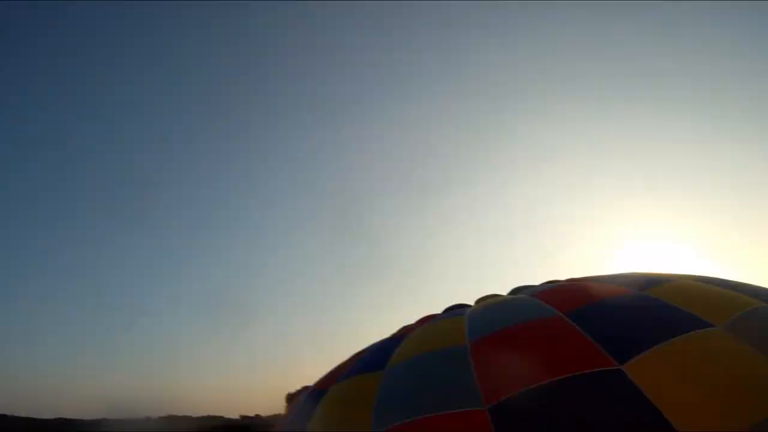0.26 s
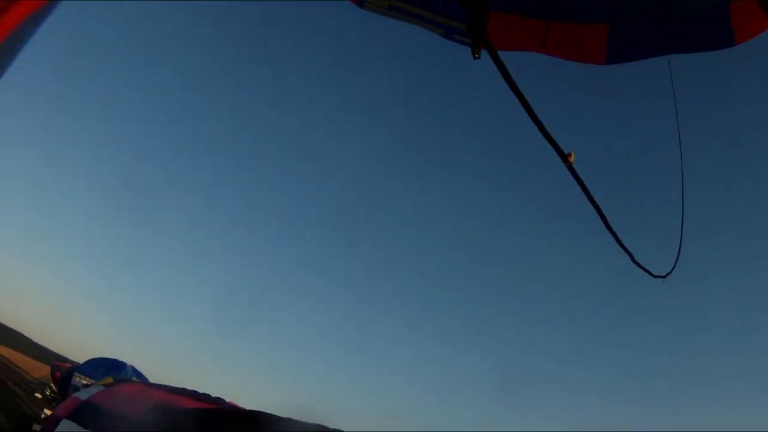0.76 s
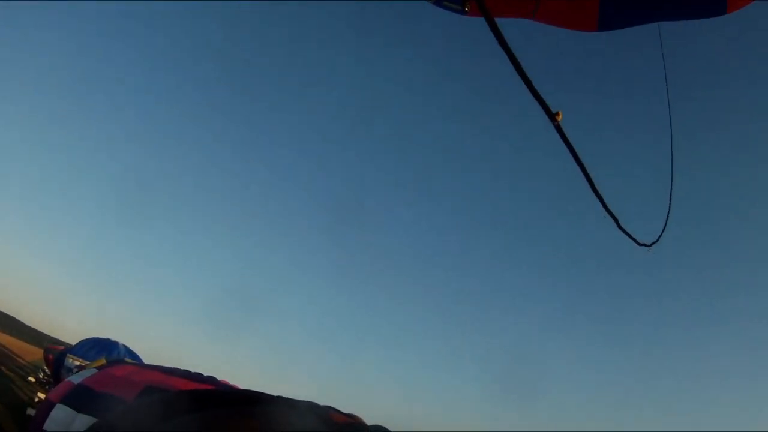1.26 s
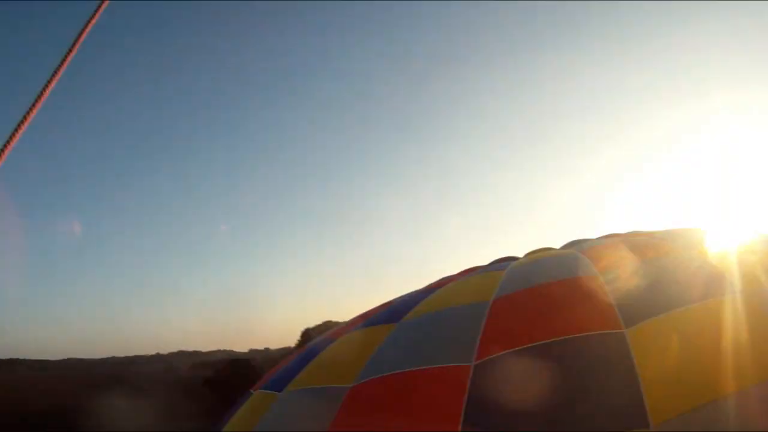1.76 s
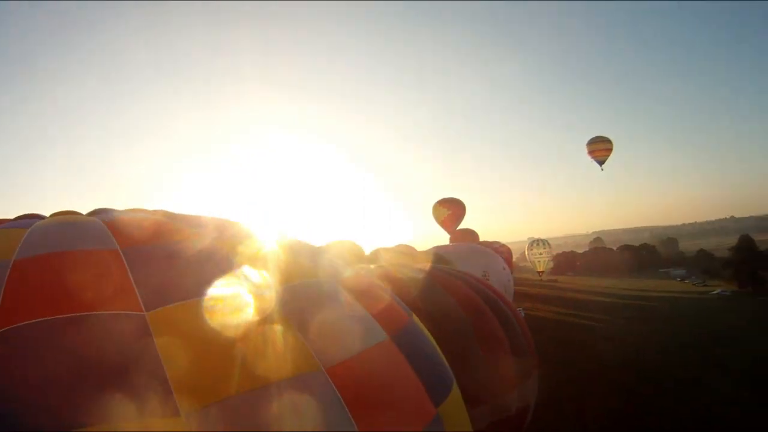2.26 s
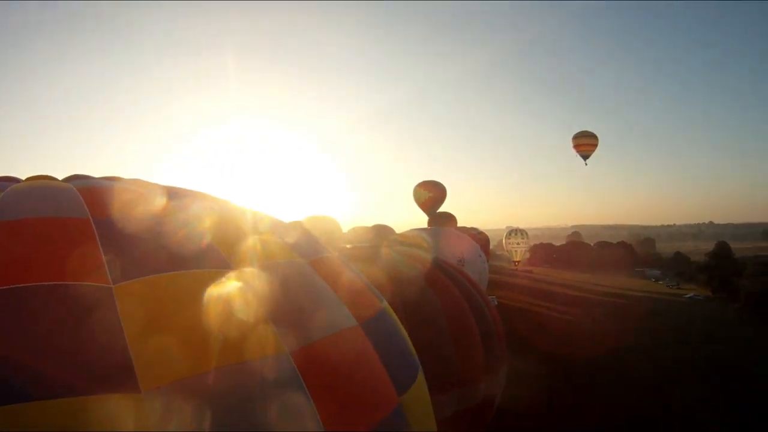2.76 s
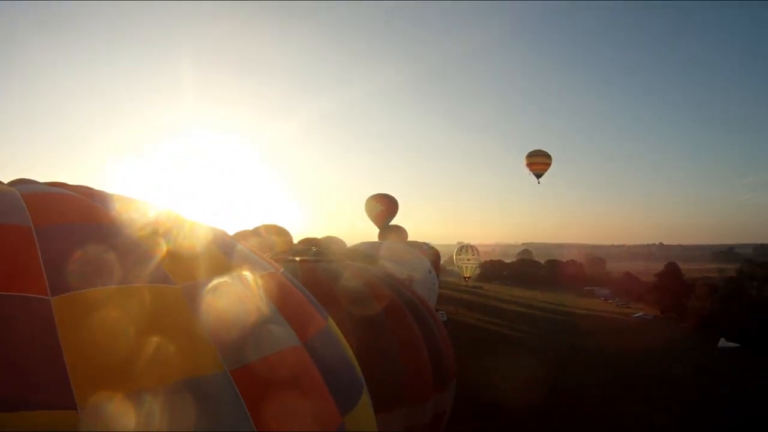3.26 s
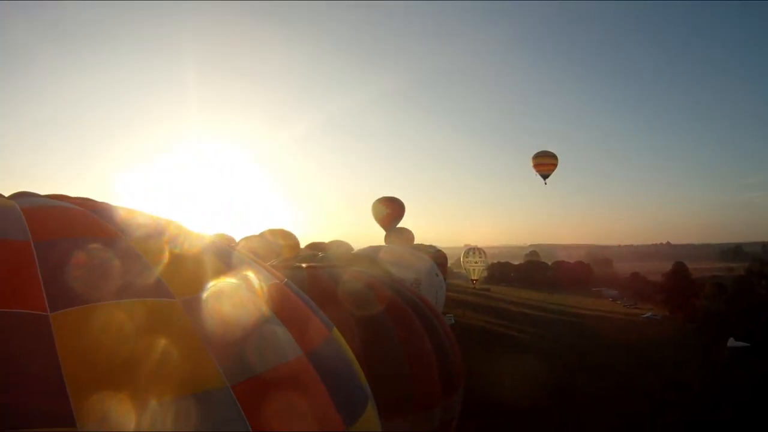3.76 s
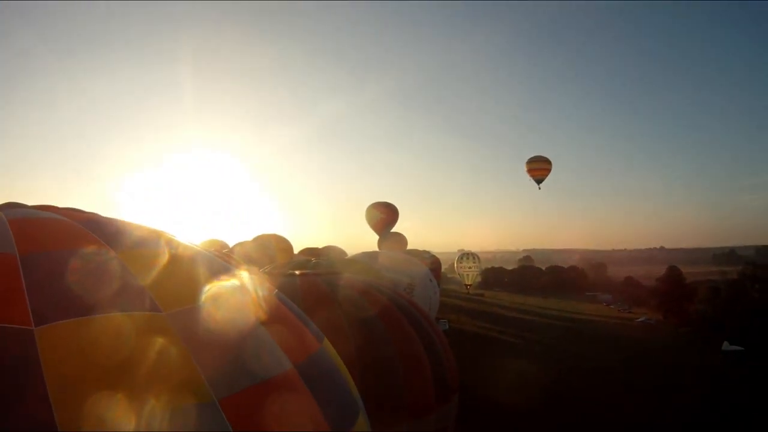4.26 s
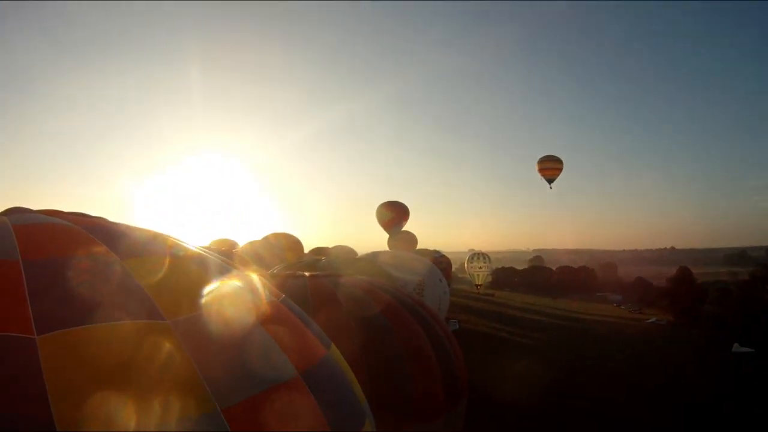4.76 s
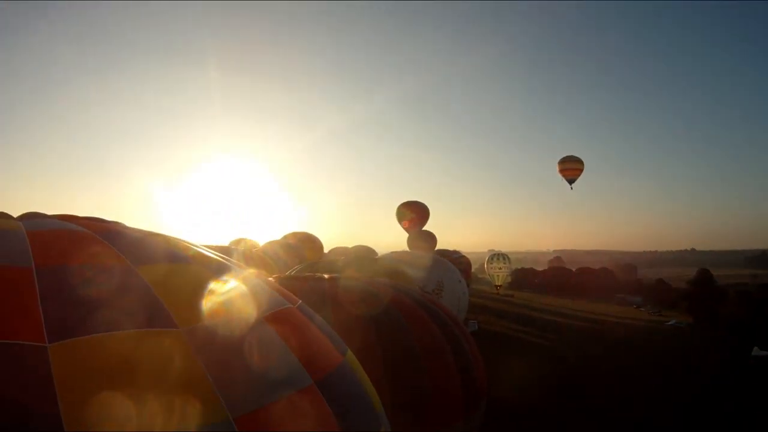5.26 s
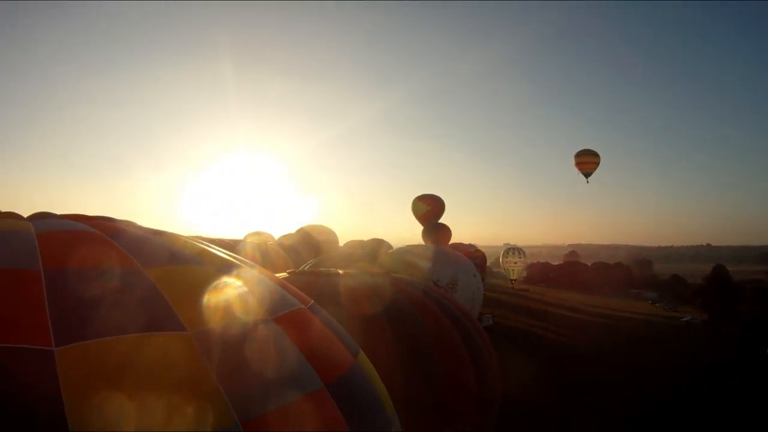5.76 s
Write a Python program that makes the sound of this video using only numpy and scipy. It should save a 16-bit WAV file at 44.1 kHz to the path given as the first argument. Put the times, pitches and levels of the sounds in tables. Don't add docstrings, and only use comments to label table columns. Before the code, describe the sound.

A balloon gas burner is heard very close, outdoors, through a small sealed camera: dull, bass-heavy, gritty and mono. It is already roaring at the start, with a soft thump near 0.1 s, and dies quickly around 0.4-0.5 s. Until 1.67 s only a much quieter rush of distant burners and fans remains, with low breeze buffeting from about 0.9 s. At 1.69 s a massive double thump with a cracking edge and bright tick lights a long blast; the level dips for an instant, then the deep fluttering roar and muffled hiss hold, the hiss easing from about 3 s and the flame cutting out at 3.5-3.6 s. The far rush returns. At 4.8 s quick hard thumps start a short blast, with more pops near 4.95 and 5.06 s, fading by 5.4 s. After a brief gap, the last blast bangs alight at 5.6 s, with several thumps, sinking from 5.9 s until the end.

```python
import sys
import numpy as np
from scipy import signal
from scipy.fft import rfft, irfft
from scipy.io import wavfile
from scipy.ndimage import uniform_filter1d

SR = 44100
rng = np.random.default_rng(int(sys.argv[2]) if len(sys.argv) > 2 else 0)


def unload_audio(sound):
    columns = np.transpose(np.atleast_2d(sound))
    steps = np.round(np.clip(columns, -1, 1) * 32767)
    wavfile.write(sys.argv[1], SR, steps.astype(np.int16))


def ratio(d):
    e = np.asarray(d, float) / 20
    return 10 ** e


N = 264600

# [t/s, peak level/dB, pace f/Hz, camera gain cut afterwards/dB, suction over push/ratio]
FLAME_PULSES = [(.114, -3, 234, 4, 0.95), (1.6881, 0, 82, 14.5, .45), (1.7056, -2.5, 115, 8, 0.63),
                (4.7935, -7.5, 161, -2.5, 0.17), (4.8057, 0.5, 335, 5.5, 1.1),
                (4.8180, -6.5, 142, -1.9, 0.96), (4.95, -4.5, 239, 3, 0.51), (5.0644, -6, 218, 3.5, 1.5),
                (5.606, 0.5, 240, 0, 6.3), (5.618, -5.5, 150, 0.6, 0.55), (5.668, -3.5, 169, 2, 0.44),
                (5.722, -6, 220, 0.5, .3), (5.7346, -4.5, 274, 2, .7), (5.9843, -10, 283, -1.5, 1.1)]
# [f/Hz, level/dB per Hz]
NEAR_ROAR_COLOUR = [(12, -50), (20, -20), (69, -5), (123, -0.5), (231, 1), (345, -2.5), (497, -1.5),
                    (646, -8.5), (770, -16.5), (966, -39), (1170, -32), (1300, -41), (1690, -64),
                    (2860, -120)]
# [f/Hz, level/dB per Hz]
FAR_ROAR_COLOUR = [(12, -38), (20, -33), (54, -10), (154, 0), (171, -1), (201, -4), (223, -7.5), (333, -7),
                   (497, -6), (603, -13.5), (1130, -41.5), (1300, -18), (1690, -61), (2860, -120)]
# [f/Hz, level/dB per Hz]
NEAR_HISS_COLOUR = [(560, 5), (950, -6.5), (1180, -12), (1310, -12.5), (1480, -12.5), (2120, 0),
                    (2360, -5.5), (2580, -5), (2920, -6.5), (3760, -19), (4000, -19), (4910, -10),
                    (5180, -15.5), (5680, -24), (5900, -16.5), (7670, -72), (13000, -120)]
# [f/Hz, level/dB per Hz]
FAR_HISS_COLOUR = [(560, -33), (950, -10), (1130, -9), (1250, -9.5), (1790, -10.5), (2150, -2),
                   (2710, -4.5), (3200, -9.5), (3790, -12.5), (4060, -17), (4910, -12), (5340, -15),
                   (5900, -30), (7670, -60), (13000, -120)]
# [t/s, level/dB]
RUMBLE_LEVEL = [(0, -25.5), (.47, -25), (.68, -29.5), (.84, -26.5), (1.14, -29.5), (1.7, -32),
                (1.95, -26.5), (2.87, -24), (3.19, -24.5), (3.39, -21.5), (3.54, -26), (4.0, -33.5),
                (4.85, -29), (4.96, -25), (5.4, -26.5), (5.6, -38), (6, -22)]
# [t/s, peak level/dB]
TICKS = [
    (1.687, -26),
    (1.708, -34),
    (4.808, -47),
    (5.604, -24),
]
# [valve opens t/s, valve shuts t/s, flame out t/s, roar level/dB, hiss level/dB]
BURNER_BLASTS = [
    (-.2, 0.36, 0.49, -15.5, -35.5),
    (1.666, 3.494, 3.627, -15.5, -34.5),
    (4.789, 5.234, 5.44, -15.5, -32.5),
    (5.589, 5.917, 6.03, -14.5, -33),
]
# [t/s, roar level/dB, hiss level/dB, roar held down before/dB]
FAR_LULLS = [
    (.56, -24, -46, 6),
    (3.663, -28, -47.5, 8),
    (5.44, -29, -48, 9.5),
]
# [t/s, level/dB]
BREEZE_LEVEL = [(0, -50), (.7, -45), (.9, -29.5), (1.15, -34), (1.45, -40), (1.6, -30), (1.75, -50),
                (6, -45)]
# [f/Hz, level/dB per Hz]
BREEZE_COLOUR = [(12, -14), (30, -6), (50, 4), (75, -14), (120, -40)]

RUMBLE_TOP_HZ = 130
HISS_HELD_DB = 8.5


def rms_one(x):
    return x / np.sqrt(np.mean(x ** 2) + 1e-20)


def level_curve(rows):
    s, level_db = np.transpose(rows)
    return uniform_filter1d(np.interp(np.arange(N) / SR, s, level_db), size=SR // 250)


def drift(rate):
    r = np.exp(-40 * np.pi * rate / SR)
    noise = rng.standard_normal(N // 20 + 2002)
    slow = signal.lfilter([1], [1, -2 * r, r * r], noise)[2000:]
    return np.interp(np.arange(N) / 20, np.arange(len(slow)), rms_one(slow))


def turbulence(spectrum, low_hz, high_hz, together_db, own_db, rate):
    hz = np.arange(N // 2 + 1) * SR / N + 1e-3
    point_hz, point_db = np.transpose(spectrum)
    colour = ratio(np.interp(np.log(hz), np.log(point_hz), point_db, left=-99, right=-99))
    noise = rfft(rng.standard_normal(N)) * colour
    place = 2 * np.log2(hz / low_hz)
    out = 0
    for k in range(1, int(2 * np.log2(high_hz / low_hz))):
        window = np.cos(np.pi / 2 * np.clip(place - k, -1, 1)) ** 2
        flicker_db = together_db + own_db * drift(rate)
        out = out + irfft(noise * window, N) * ratio(flicker_db)
    return rms_one(out)


def lulls(lead=0):
    grip_s = .025
    return_s = 0.02
    creep_s, creep_share = 0.15, 0.084
    hiss_creep_db, hiss_creep_s = 1.5, 0.27
    t = np.arange(N) / SR
    ends = [opens + grip_s for opens, *_ in BURNER_BLASTS[1:]]
    which = np.minimum(np.searchsorted(ends, t), len(FAR_LULLS) - 1)
    starts, roar_db, hiss_db, roar_held_db = np.array(FAR_LULLS)[which].T
    since = np.maximum(t - starts + lead, 0)
    held = (1 - creep_share) * np.exp(-since / return_s) + creep_share * np.exp(-since / creep_s)
    held = np.where(t < ends[-1], held, 1)
    loss_db = roar_held_db * held
    far_hiss_db = hiss_db - HISS_HELD_DB * held - hiss_creep_db * np.exp(-since / hiss_creep_s)
    return uniform_filter1d((roar_db - loss_db, far_hiss_db, loss_db, held), size=SR // 50)


def ducking(recovery_s):
    flare_db, flare_s = 1.5, 0.021
    t, gain_db = np.arange(N) / SR, np.zeros(N)
    for s, _, pace_hz, cut_db, _ in FLAME_PULSES:
        since = np.maximum(t - s - 0.088 / pace_hz, 0)
        gain_db -= cut_db * (1 - np.exp(-since / 0.0011)) * np.exp(-since / recovery_s)
        gain_db += flare_db * np.exp(np.minimum(t - s, 0) / flare_s - since / 0.0014)
    return ratio(gain_db)


def breeze():
    return ratio(level_curve(BREEZE_LEVEL)) * turbulence(BREEZE_COLOUR, 10.0, 130, 0, 2.0, rate=4)


def rumble(flutter, near_roar):
    unlit = 1 - near_roar / near_roar.max()
    level_db = level_curve(RUMBLE_LEVEL) - lulls()[2] * unlit ** 2
    heave = turbulence(FAR_ROAR_COLOUR, 9.43, RUMBLE_TOP_HZ * 1.3, 0.24 * flutter, 0.86, rate=15.0)
    return ratio(level_db) * heave


def far_burners():
    flutter = drift(45)
    roar = turbulence(FAR_ROAR_COLOUR, RUMBLE_TOP_HZ * 0.88, 1700, 0.12 * flutter, 0.72, rate=4.7)
    hiss = turbulence(FAR_HISS_COLOUR, 770, 8500, 0.21 * flutter, 0.98, rate=32)
    roar_db = lulls()[0]
    hiss_db = lulls(lead=0.0096)[1]
    return ratio(roar_db) * roar, ratio(hiss_db) * hiss


def ticks():
    t, out = np.arange(SR // 100) / SR, np.zeros(N)
    for s, peak_db in TICKS:
        burst = rng.standard_normal(len(t)) * np.exp(-t / 0.0017)
        out[round(s * SR):][:len(t)] += ratio(peak_db) * burst
    band = signal.butter(2, [1100, 4400], "band", fs=SR, output="sos")
    return signal.sosfilt(band, out) * 2


def thumps():
    sharpness, steepens_below_hz = 1, 115.5
    out = np.zeros(N)
    for s, peak_db, pace_hz, _, suction in FLAME_PULSES:
        at = np.arange(round((s - .03) * SR), min(round((s + .03) * SR), N))
        turn = 2 * np.pi * pace_hz * (at / SR - s)
        steepening = (steepens_below_hz / pace_hz) ** 6
        front = np.tanh((sharpness + steepening) * turn)
        pulse = front * np.exp(-turn ** 2 / 5.0) * (1 + suction + (1 - suction) * front)
        out[at] += ratio(peak_db) * pulse / np.abs(pulse).max()
    return out


def blast_gains():
    light_s = .012
    ease_s, ease_db_per_s = 0.46, 14.5
    sink_db, sink_bend = 17, 1.4
    out_db_per_s = 608
    jet_fall_share = 0.96
    t = np.arange(N) / SR
    roar, hiss = np.full(N, 1e-12), np.full(N, 1e-12)
    for opens, shuts, out, roar_db, hiss_db in BURNER_BLASTS:
        lit = 1 - np.exp(-np.maximum(t - opens, 0) / light_s)
        emptied = np.clip((t - shuts) / (out - shuts), 0, 1)
        fall_db = sink_db * emptied ** sink_bend + out_db_per_s * np.maximum(t - out, 0)
        eased_db = ease_db_per_s * np.maximum(t - shuts + ease_s, 0)
        roar += lit * ratio(roar_db - fall_db)
        hiss += lit * ratio(hiss_db - eased_db - jet_fall_share * fall_db)
    return roar, hiss


def near_burner(flutter, roar_gain, hiss_gain):
    roar = turbulence(NEAR_ROAR_COLOUR, RUMBLE_TOP_HZ * 0.761, 1700, 1.36 * flutter, 1.11, rate=11.5)
    hiss = turbulence(NEAR_HISS_COLOUR, 620, 8500, 0.5 * flutter, 0.98, rate=30)
    return roar_gain * roar, hiss_gain * hiss


def burners():
    flutter = drift(37.5)
    roar_gain, hiss_gain = blast_gains()
    far_roar, far_hiss = far_burners()
    near_roar, near_hiss = near_burner(flutter, roar_gain, hiss_gain)
    low = rumble(flutter, roar_gain) + far_roar + near_roar
    return low * ducking(recovery_s=0.063) + (far_hiss + near_hiss) * ducking(recovery_s=0.12)


def scene():
    return (breeze() + ticks() + thumps() + burners())[None, :]


def low_pass(x):
    return signal.sosfilt(signal.butter(12, 16440, fs=SR, output="sos"), x)


def record(dry):
    hold_hz, carrier_hz = 12000, 48000
    clip_top, self_noise_db = .95, -66
    top_hz = 15720
    knee = np.abs(dry / clip_top) ** 8
    rounded = dry / (1 + knee) ** (1 / 8)
    padded = np.pad(rounded, [(0, 0), (0, SR // 10)], mode="reflect")
    sampled = signal.resample_poly(padded, hold_hz // 300, SR // 300, axis=1)
    noise_gain = ratio(self_noise_db - HISS_HELD_DB * lulls()[-1])
    moments = np.arange(sampled.shape[1]) * SR / hold_hz
    noise = rng.standard_normal(sampled.shape)
    sampled = sampled + np.interp(moments, np.arange(N), noise_gain) * noise
    held = np.repeat(sampled, carrier_hz // hold_hz, axis=1)
    x = signal.resample_poly(held, SR // 300, carrier_hz // 300, axis=1)
    hz = np.fft.rfftfreq(x.shape[1], 1 / SR)
    top_db = np.interp(hz, [8000, 15150, 15350, top_hz, top_hz + 60], [1, -2.5, -9, -17, -70])
    x = irfft(rfft(x) * ratio(top_db), x.shape[1])[:, :N]
    mix = x * np.clip(np.arange(N)[::-1] / (SR // 400), 0, 1)
    return low_pass(mix)


dry = scene()
out = record(dry)
unload_audio(out)
```